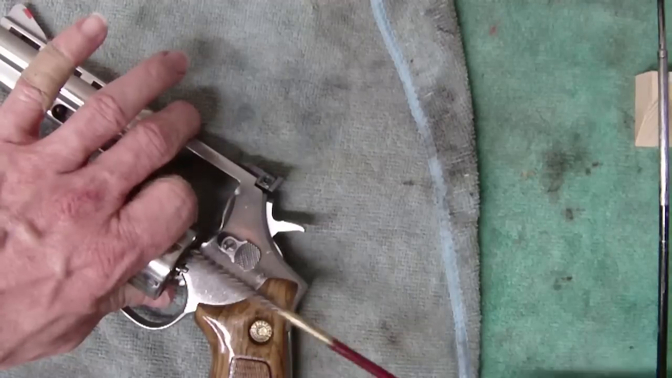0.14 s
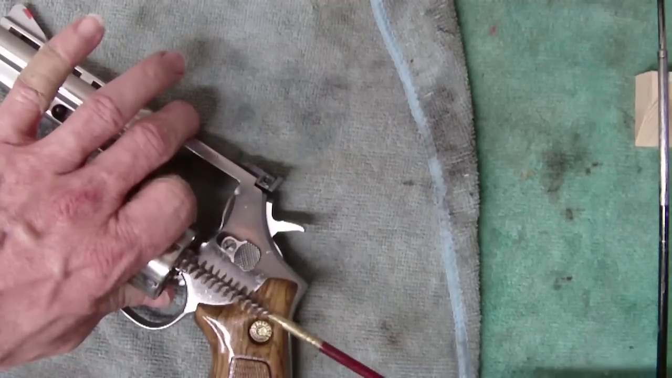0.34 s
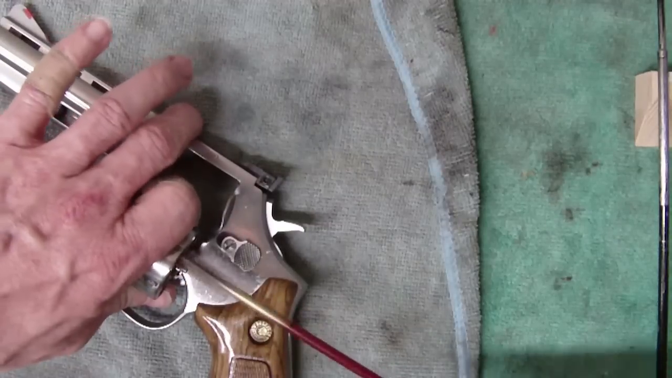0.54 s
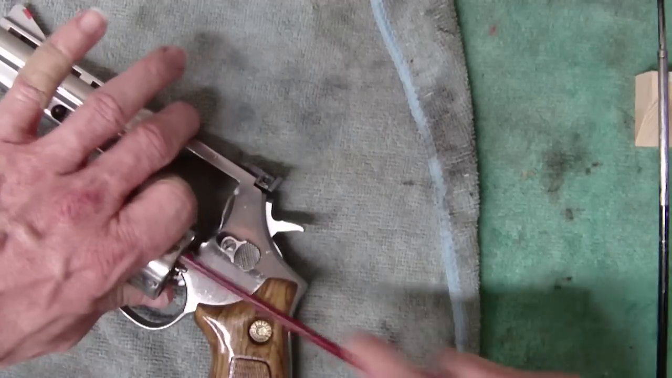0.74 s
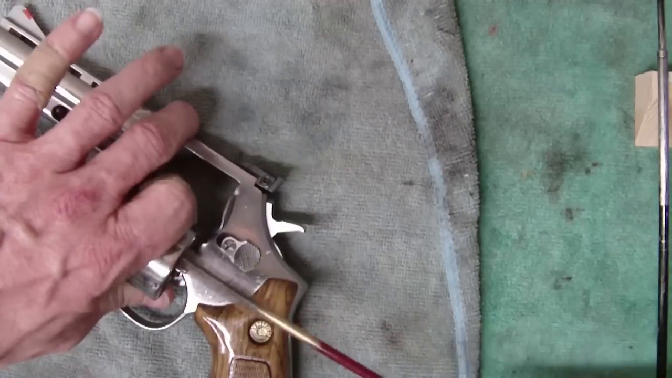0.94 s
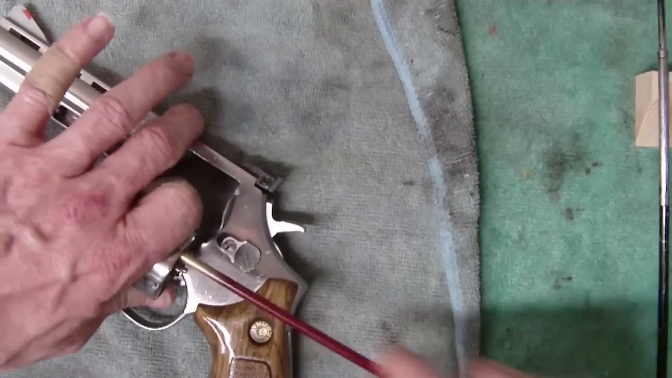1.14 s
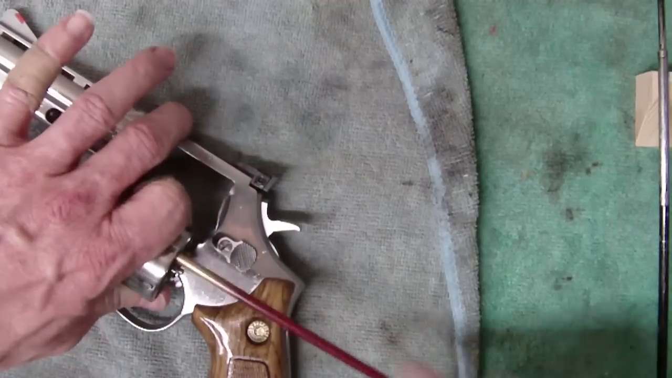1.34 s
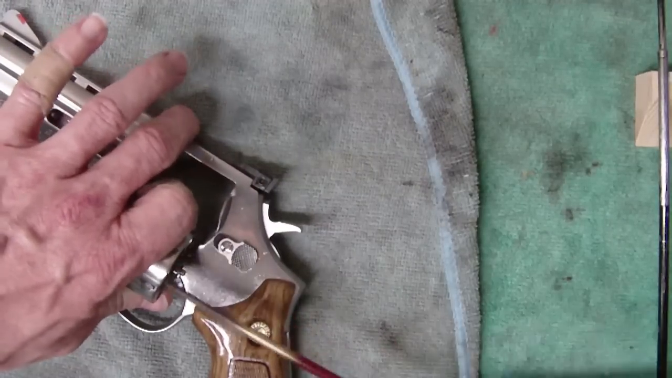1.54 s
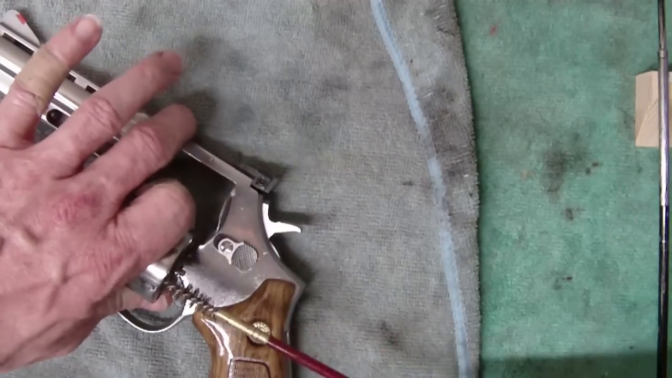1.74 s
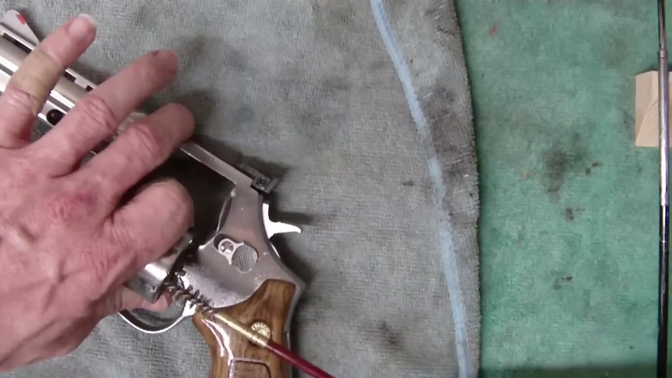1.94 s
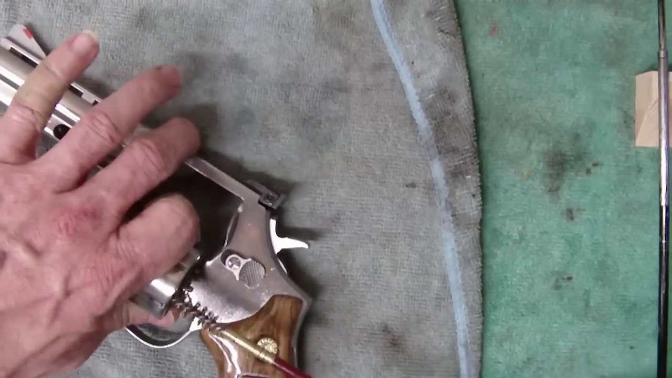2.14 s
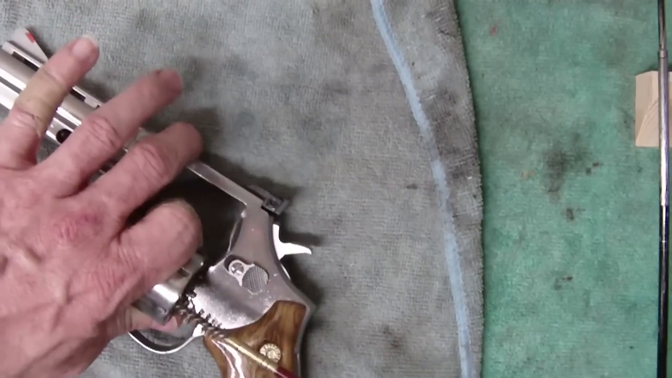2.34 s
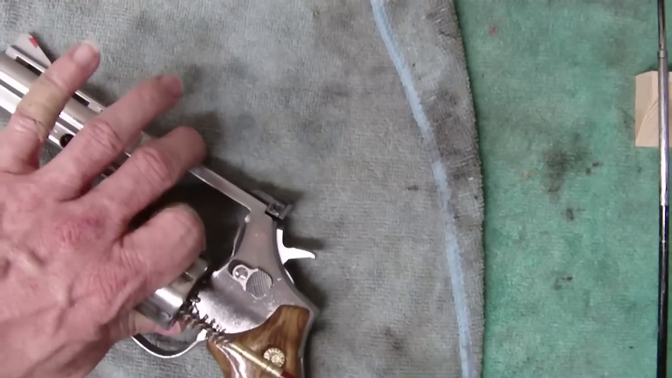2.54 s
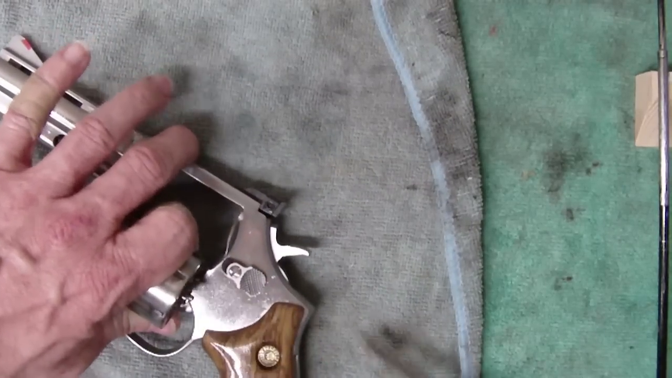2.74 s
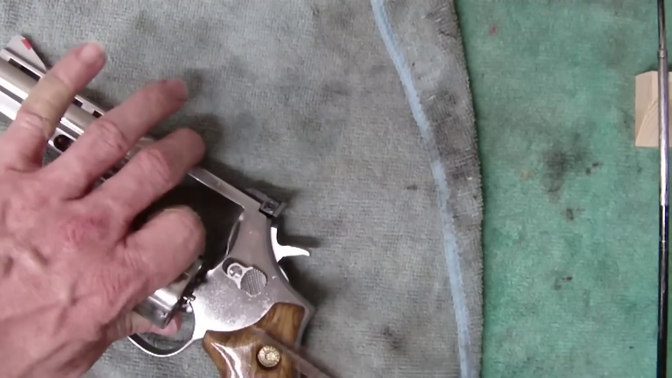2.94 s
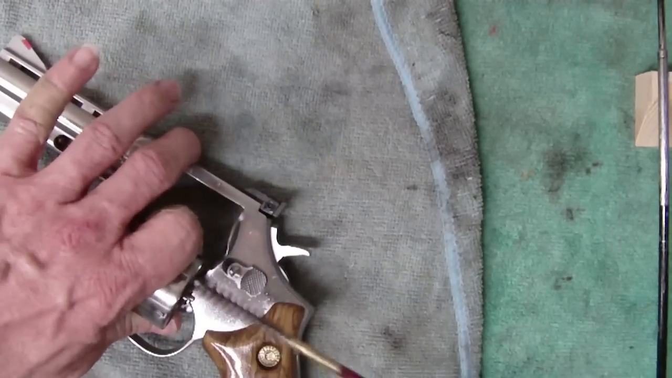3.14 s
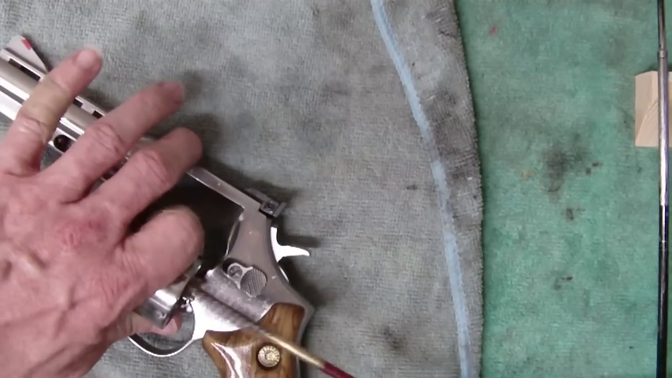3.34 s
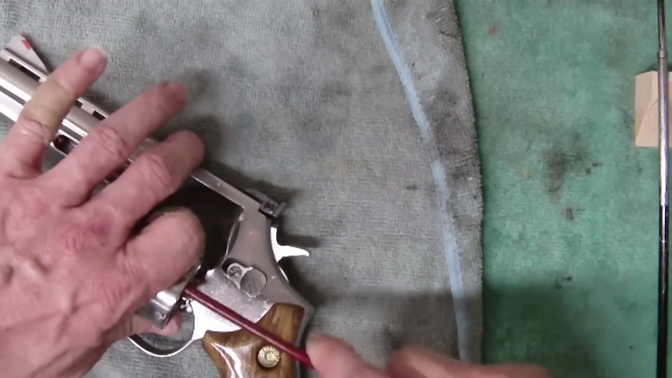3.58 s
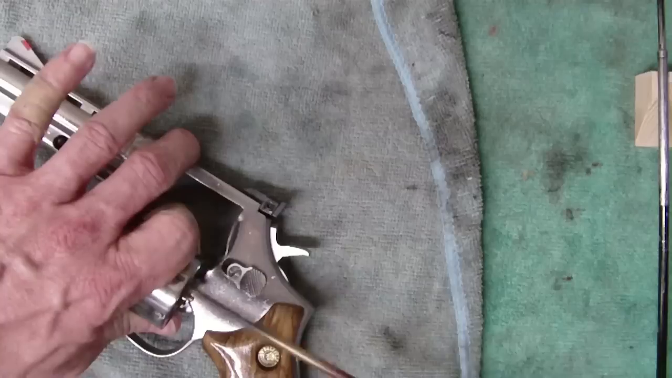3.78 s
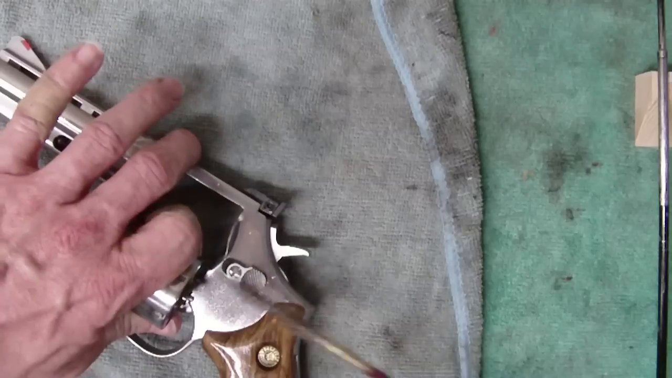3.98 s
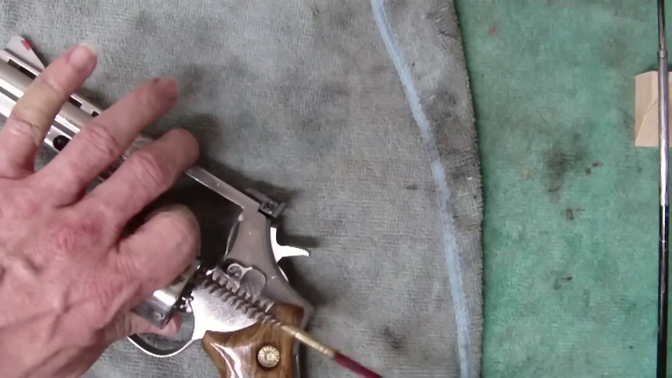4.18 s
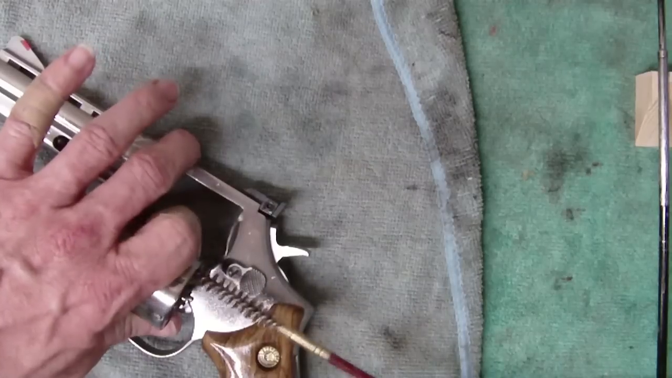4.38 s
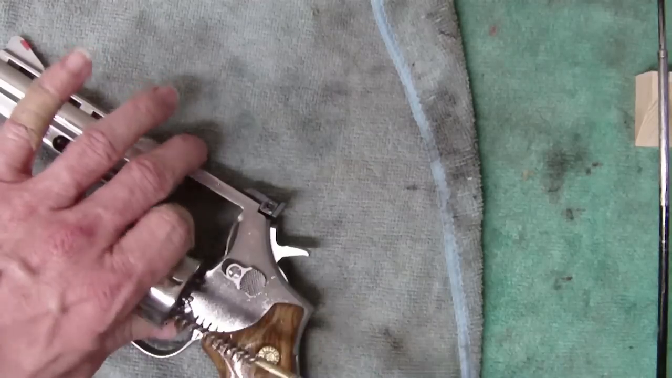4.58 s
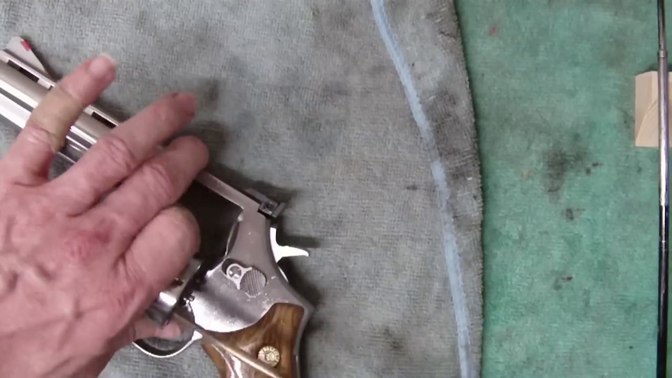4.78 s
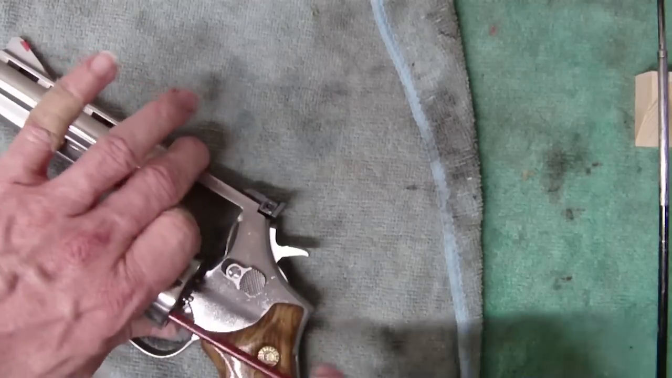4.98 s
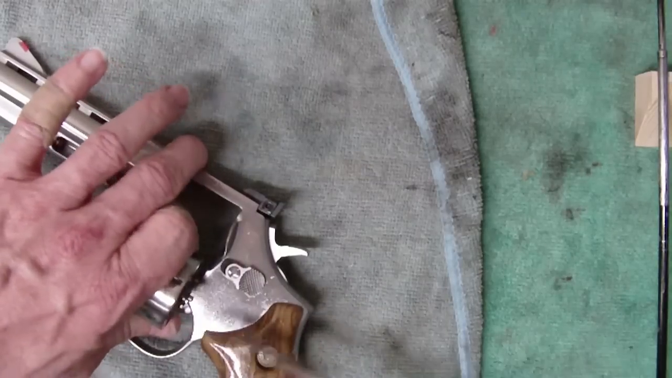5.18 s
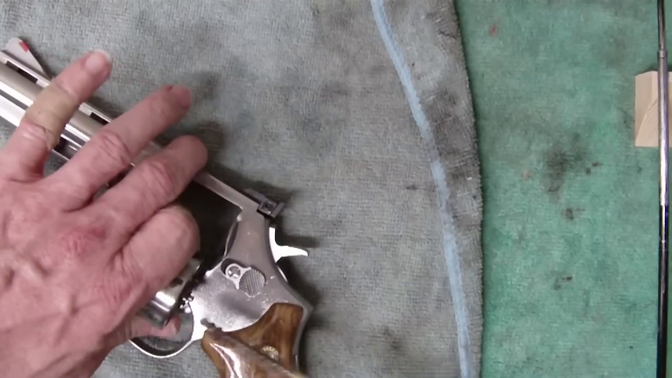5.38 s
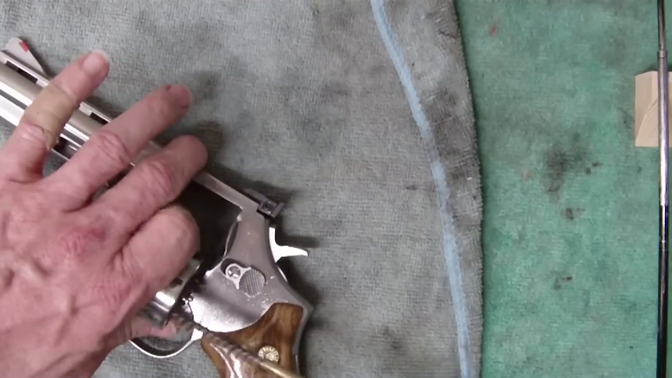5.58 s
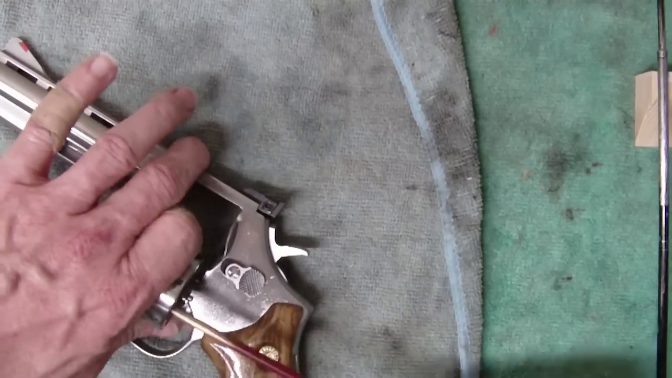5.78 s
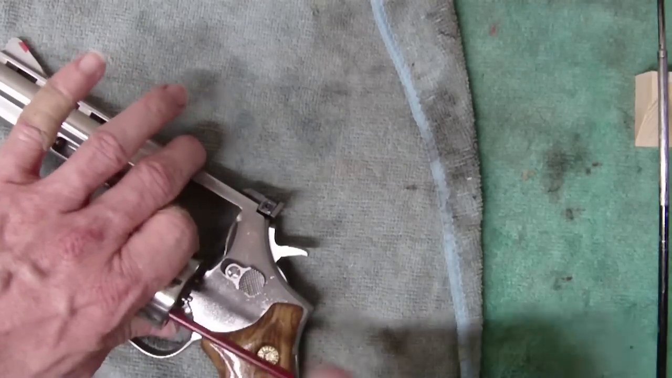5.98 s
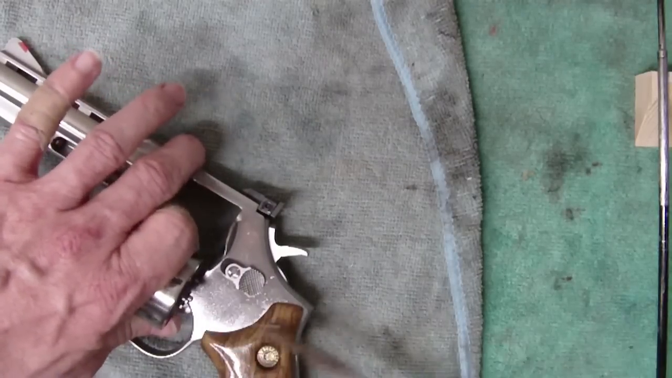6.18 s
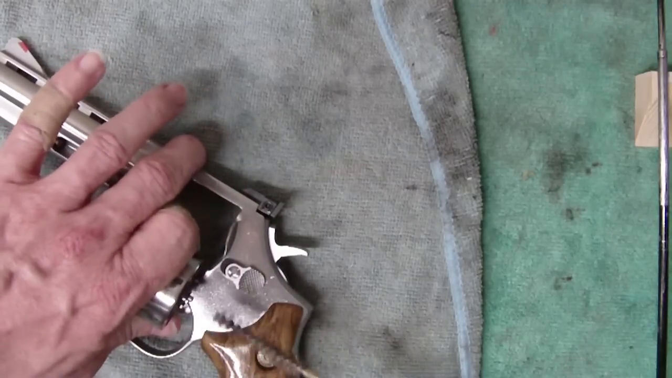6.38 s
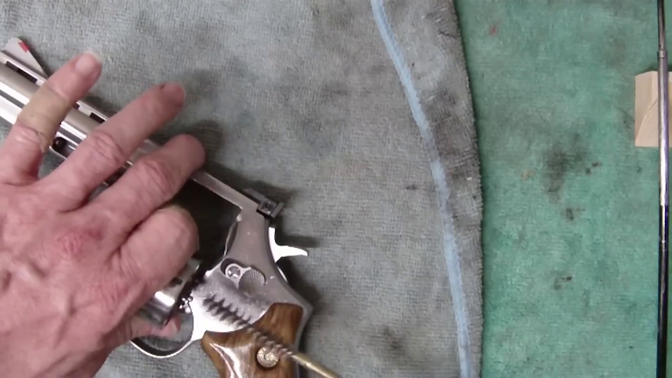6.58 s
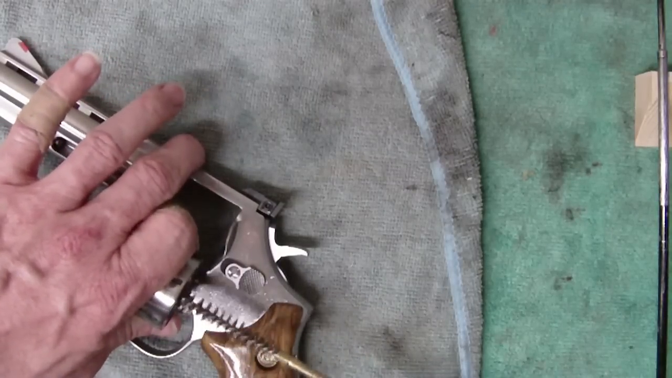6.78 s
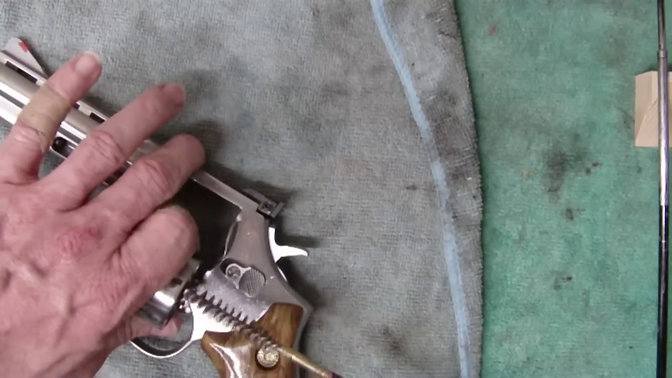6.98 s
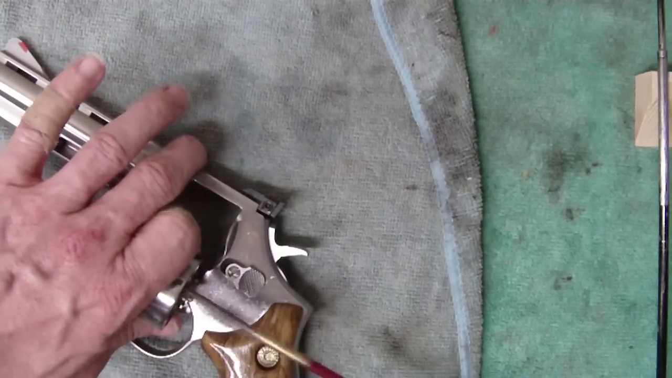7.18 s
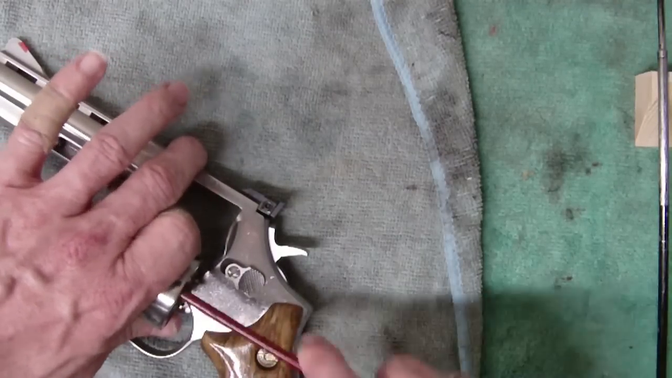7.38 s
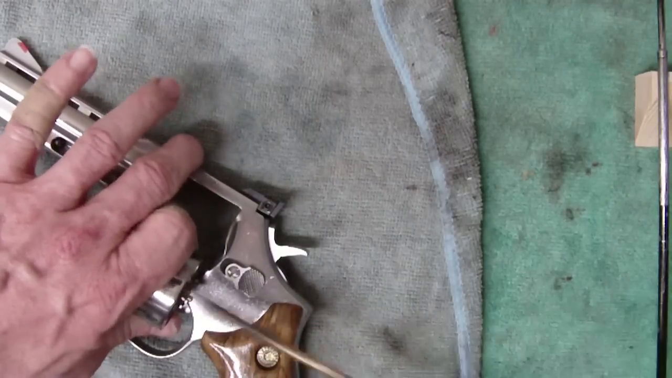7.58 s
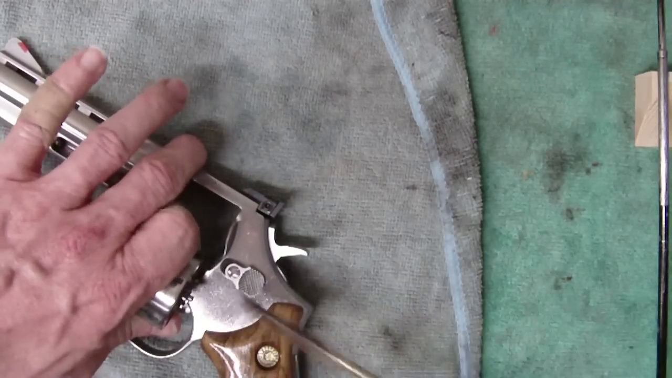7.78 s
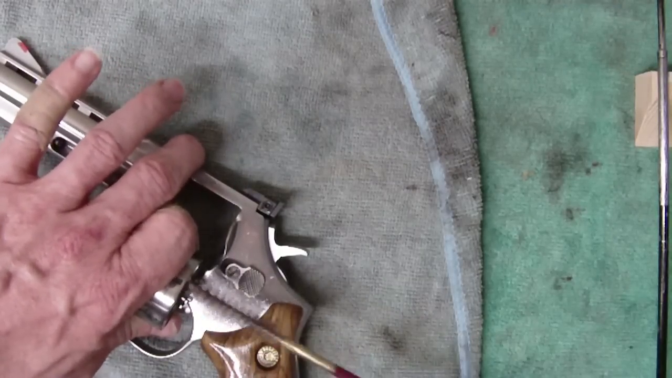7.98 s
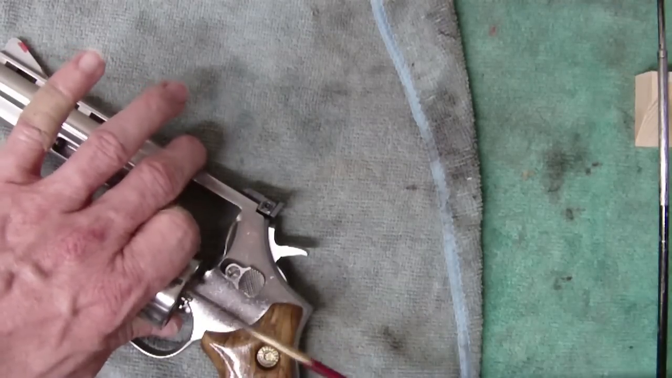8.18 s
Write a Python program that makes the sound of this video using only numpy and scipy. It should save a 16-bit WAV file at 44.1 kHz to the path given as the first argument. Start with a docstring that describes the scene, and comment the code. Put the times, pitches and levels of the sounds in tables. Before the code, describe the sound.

Close up, a stiff wire brush scrapes through small steel bores, hissing and grinding in paired strokes with ticks, hollow tunks and brief high squeaks.

```python
"""A wire brush on a cleaning rod hisses and grinds through a revolver's chambers, pushed in and pulled back up close.
Random bristle flicks, shaped by each stroke, drive filters for the tips and bore and damped modes for the steel.
Knocks strike the same parts; gliding sines make the hollow tunks and the squeaks of the rod.
Noise through low modes rocks the padded bench; a short noise tail and soft hiss make the small, quiet workshop."""
import sys
import numpy as np
from scipy import signal
from scipy.fft import rfft, irfft
from scipy.io import wavfile
from scipy.ndimage import uniform_filter1d, map_coordinates

SR = 44100
rng = np.random.default_rng(int(sys.argv[2]) if len(sys.argv) > 2 else 0)


def wrap_up_sound(samples):
    """Save the sound to the file named by the first command line argument, as 16-bit audio."""
    columns = np.atleast_2d(samples).T
    # keep every value between -1 and 1, then stretch to whole-number steps
    tamed = np.clip(columns, -1, 1)
    steps = np.round(tamed * 32767).astype(np.int16)
    wavfile.write(sys.argv[1], SR, steps)


N = 362733
TIME = np.arange(N) / SR
CONTROL = TIME[::32]  # coarse clock for the motion of the hands (s)

# Brush going in: it glides up to speed, bites into the bore, grinds on and stops. Each row: bite in seconds,
# attack, hold and release in seconds, then base level in dB of tips, rod, bore, frame, chamber and bench.
PUSH_STROKES = [(0.110, 0.11, .092, 0.071, -44.5, -42, -46.5, -47.5, -48, -37),
                (1.106, 0.12, 0.076, 0.049, -45, -42.5, -43, -48, -51, -41),
                (1.627, 0.22, 0.1, 0.062, -44, -40.5, -45.5, -48.5, -45.5, -38),
                (3.181, 0.034, 0.02, 0.018, -45.5, -47.5, -40.5, -44, -41, -36),
                (3.982, 0.15, 0.11, .042, -47.5, -41.5, -44.5, -46.5, -48.5, -35.5),
                (4.987, 0.04, 0.04, 0.044, -49.5, -51.5, -56.5, -46.5, -66, -61.5),
                (5.361, 0.14, 0.099, 0.04, -45, -39, -45.5, -49, -50, -43.5),
                (6.297, 0.13, 0.11, 0.043, -45, -44, -45, -47, -47.5, -38.5),
                (7.784, 0.097, 0.071, 0.039, -43.5, -41.5, -43, -48, -47, -38.5)]
# Brush drawn back, tight in the bore from the start. Each row: full speed in seconds, attack, hold and release
# in seconds, then base level in dB of tips, rod, bore, frame, chamber and bench.
PULL_STROKES = [(0.343, 0.062, 0.079, 0.062, -44, -46.5, -45.5, -44.5, -51.5, -45.5),
                (1.315, .075, 0.17, 0.062, -46.5, -46.5, -47.5, -46.5, -55, -45),
                (1.862, 0.098, 0.12, 0.057, -44, -45.5, -47.5, -44, -52, -48),
                (2.06, 0.013, .05, .085, -49.5, -45, -59, -52, -60.5, -46),
                (3.232, 0.0047, 0.0087, .035, -42, -55, -41, -48, -44.5, -38),
                (4.223, 0.058, 0.081, 0.031, -43.5, -42.5, -44, -43, -48, -44.5),
                (5.596, 0.068, 0.073, 0.038, -44, -44, -45.5, -44, -51.5, -44),
                (6.573, 0.075, 0.065, 0.045, -45.5, -45.5, -45.5, -47, -49, -42.5),
                (8.032, 0.079, 0.062, 0.037, -45.5, -46.5, -46, -44, -48.5, -40.5)]
# Rod sticking and slipping as the stroke turns round. Each row: start in seconds, level in dB, pitch in Hz.
ROD_SQUEAKS = [(0.2188, -38, 3990), (0.2601, -34, 4590), (1.268, -41.5, 4550), (1.7858, -30, 4600),
               (1.8138, -41, 4800), (4.0841, -34, 4700), (4.1364, -38.5, 4640), (5.4804, -42.5, 4900),
               (6.4854, -43, 4450), (7.6835, -50, 3520), (7.958, -48, 4730)]
# Ringing modes of the cleaning rod. Each row: frequency in Hz, width in Hz, relative level in dB.
ROD_MODES = [(3910, 290, -7), (4190, 180, -6), (4492, 93, -0.5), (4648, 80, 1), (4744, 67, 3.5),
             (5010, 59, -3.5), (5130, 200, -2), (5355, 120, 2), (5457, 200, -4)]
# Hiss of the free bristle tips. Each row: frequency in Hz, relative level in dB.
TIP_SPECTRUM = [(2000, -28), (4000, -7.5), (5700, 2.5), (6800, -0.5), (7500, 0), (8400, -0.5), (9200, -0.5),
                (10100, 1.5), (11500, -2.5), (13000, -6.5), (15800, -11)]


def undb(db):
    """Decibels to gain."""
    return 10 ** (np.asarray(db) / 20)


def unit(response):
    """Scale a signal to unit energy."""
    return response / np.sqrt(np.sum(response ** 2))


def through(x, response):
    """Pass a force through an impulse response."""
    return signal.fftconvolve(x, response)[:N]


def colour(points, size=4096):
    """Minimum-phase impulse response shaped by (Hz, dB) points, with unit energy."""
    hz, db = np.transpose(points)
    bins = np.maximum(np.arange(size // 2 + 1) * SR / size, 1)
    level_db = np.interp(np.log(bins), np.log(hz), db)
    cepstrum = irfft(np.log(undb(level_db)))
    # folding the cepstrum makes the response causal
    cepstrum[1:size // 2] *= 2
    cepstrum[size // 2 + 1:] = 0
    return unit(irfft(np.exp(rfft(cepstrum))))


def ring(modes, size=16384):
    """Impulse response of damped modes; neighbours swing in opposite directions."""
    t = TIME[:size]
    total = np.zeros(size)
    for k, (hz, width_hz, db) in enumerate(modes):
        decay = np.exp(-np.pi * width_hz * t)
        total += (-1) ** k * undb(db) * width_hz * decay * np.sin(2 * np.pi * hz * t)
    return unit(total)


def high_pass(x, hz, order=2):
    """Small parts radiate little bass."""
    return signal.sosfilt(signal.butter(order, hz, "high", fs=SR, output="sos"), x)


def walk(rate):
    """Random wander with a spread near 1, gliding between new values at the given rate per second."""
    knots = rng.standard_normal(N // 8)
    return np.sqrt(1.5) * np.interp(TIME * rate, np.arange(len(knots)), knots)


def hump(s, db, length_s):
    """A smooth swell of gain around one moment."""
    return undb(db) * np.exp(-((CONTROL - s) / length_s) ** 2)


def swell_db(start_s, attack_s, hold_s, release_s, sag_db_per_s):
    """Level of one stroke: the hand speeds up, holds with a tilt in level, and slows down."""
    # attack and release times span 20 dB; the powers bend the rise and fall
    early = np.maximum(start_s - CONTROL, 0) / attack_s
    late = np.maximum(CONTROL - start_s - hold_s, 0) / release_s
    since_middle = np.clip(CONTROL - start_s, 0, hold_s) - hold_s / 2
    return -20 * (early ** 1.82 + late ** 0.96) - sag_db_per_s * since_middle


def flicks(per_second, spread_db):
    """Bristles snapping free at random moments, many weak and a few strong; rms 1."""
    fired = rng.random(N) < per_second / SR
    strength_db = spread_db * np.minimum(rng.exponential(size=N), 5)
    clicks = fired * rng.choice([-1, 1], N) * undb(strength_db)
    return clicks / np.std(clicks)


def rubbing():
    """Forces of the moving brush on the tips, rod, bore, frame and chamber, made of random bristle flicks."""
    catch_db = 1.3 * walk(rate=190) + .6 * walk(rate=36)  # rows of bristles catch and slip together
    chatter_db = 1.2 * walk(rate=330)  # the rod rattles in the mouth of the chamber
    fine = flicks(per_second=6500, spread_db=2.0)
    coarse = flicks(per_second=2800, spread_db=1.5)
    drag = flicks(per_second=1500, spread_db=0.65)
    tips = bore_echo(fine, share=0.3, trip_s=.00028, travel=0.41)
    rod = bore_echo(coarse, share=.3, trip_s=.0007, travel=.25) * undb(chatter_db)
    bore = bore_echo(fine, share=0.55, trip_s=0.000505, travel=.35)
    forces = [tips, rod, bore, coarse, drag]
    return [force * drive(order) * undb(catch_db) for order, force in enumerate(forces)]


def drive(order):
    """How hard the strokes rub the part of that order: loose, bite and jam in a push, sag, then a light touch."""
    # How tips, rod, bore, frame and chamber answer a stroke. Each row: change while a pushed brush is loose in dB,
    # change at the jam in dB, sag in a push in dB/s, sag in a pull in dB/s (negative sags grow louder),
    # share of the release time, unevenness in dB, level of the lingering light touch in dB.
    response = [(0, 1, 10, 5.5, .95, 0.38, -32), (1, -1, 4.5, 10.5, 0.63, 1.0, -25),
                (-12.5, 4, 24.5, -30, 1.1, 1.0, -27.5), (-1.5, 2.5, 15, 5, 0.57, 1.6, -22),
                (-14, 2, 20, 55, 1.35, 1.24, -23)]
    # When the bristles touch the steel. Each row: start in seconds, end in seconds.
    touches = [(-.05, 0.46), (.69, 0.94), (.925, 1.495), (1.533, 1.94), (2.058, 2.29), (3.14, 3.25),
               (3.848, 4.366), (4.79, 5.15), (5.25, 5.77), (6.135, 6.7), (7.62, 8.15)]
    bite_s, jam_s = .006, 0.015  # time to wedge into the bore; delay and length of the jam
    linger_s = .3  # the light touch rises and fades by 20 dB in this time
    meet_s, part_s = 0.012, .025  # softness of the bristles meeting and leaving the steel
    loose_db, jam_db, push_sag, pull_sag, release_share, uneven_db, touch_db = response[order]
    power = 0
    for strokes, pushing, sag in ((PUSH_STROKES, True, push_sag), (PULL_STROKES, False, pull_sag)):
        for s, attack_s, hold_s, release_s, *parts_db in strokes:
            rub_db = swell_db(s, attack_s, hold_s, release_s * release_share, sag)
            if pushing:
                loose = (1 - np.tanh((CONTROL - s) / bite_s)) / 2
                rub_db = rub_db + loose_db * loose + jam_db * hump(s + jam_s, 0, jam_s)
            light_db = touch_db + swell_db(s, linger_s, hold_s, linger_s, 0)
            power = power + undb(parts_db[order] + rub_db) ** 2
            power = power + undb(parts_db[order] + light_db) ** 2
    touching = 0
    for start, end in touches:
        meeting = np.tanh((CONTROL - start) / meet_s)
        parting = np.tanh((CONTROL - end) / part_s)
        touching = touching + (meeting - parting) / 2
    return np.interp(TIME, CONTROL, touching * np.sqrt(power)) * undb(uneven_db * walk(rate=45))


def bore_echo(x, share, trip_s, travel):
    """Sound bounces between brush and chamber mouth; the echo delay wanders, sweeping the colour."""
    lag = trip_s * SR * np.exp(travel * walk(rate=14))  # samples
    echo = map_coordinates(x, [np.arange(N) - lag], order=3)
    return (x - share * echo) / np.sqrt(1 + share ** 2)


def knocking(order, size=2048):
    """Force of the knocks on the part of that order: a sharp contact, then a short scuff as the rod skids."""
    # Rod and brush tip striking the steel; hard contacts tick, soft ones ring the frame.
    # Each row: start in seconds, base level in dB, hardness in dB.
    knocks = [(0.1961, -42, 6), (0.2925, -41, 9.5), (0.3571, -35, -6), (0.6853, -36, -9.5),
              (0.7218, -37, -6), (0.7925, -42, 1.5), (0.9252, -51, 0.5), (1.5327, -38, -2),
              (1.7257, -27.5, 6.5), (1.988, -57, 6), (2.0591, -43, -2), (3.1667, -44, 4.5),
              (3.2282, -32.5, -4), (3.3745, -55.5, 2.5), (3.4448, -64, 2), (3.8493, -53.5, -5.5),
              (3.9137, -41, -2.5), (4.068, -49, 16), (4.0836, -39, 8.5), (4.7854, -59, -1.5),
              (5.2565, -56.5, -6), (5.4811, -40, 5.5), (6.1386, -57, -11), (6.2200, -46, -2),
              (6.3917, -33, 7), (6.4884, -46.5, 1), (7.6186, -57, -6), (7.656, -51.5, -.5),
              (7.9816, -44, -7)]
    # What a knock gives to tips, rod, bore, frame and chamber.
    # Each row: gain in dB, dB per dB of hardness, scuff level in dB, scuff decay in seconds.
    contact = [(12.8, 0.96, 1, .0023), (19.92, 0.96, 2, .0044), (12, 0.5, -5.5, .003),
               (21.6, -0.67, -14.5, .003), (13, 0.35, -12.5, .004)]
    gain_db, tilt, scuff_db, scuff_s = contact[order]
    force = np.zeros(N + size)
    for s, db, hardness_db in knocks:
        scuff = unit(rng.standard_normal(size) * np.exp(-TIME[:size] / scuff_s))
        blow = undb(scuff_db) * scuff
        blow[0] += 1
        start = int(s * SR)
        force[start:start + size] += unit(blow) * undb(db + gain_db + tilt * hardness_db)
    return force[:N]


def gun_parts():
    """Impulse responses of tips, rod, bore, frame and chamber: bristle spectra and ringing steel and air."""
    # Bristles bent tight in the bore. Each row: frequency in Hz, relative level in dB.
    grind = [(150, -24.5), (300, -1), (850, -8.5), (1300, -10.5), (1600, -2), (2400, 3), (2800, -1.5),
             (3400, 7), (3700, 0.5), (4400, -3), (6000, -5.5), (12000, -23)]
    # Modes of the cylinder walls. Each row: frequency in Hz, width in Hz, relative level in dB.
    cylinder = [(2570, 51, -3.5), (2748, 49, 3.5), (3007, 54, -7.5), (3460, 48, -1)]
    # Modes of the steel frame. Each row: frequency in Hz, width in Hz, relative level in dB.
    frame = [(1365, 264, -19.5), (1746, 37, -4), (1843, 80, -3), (1909, 48, 3), (1995.5, 32, 0),
             (2055, 37, -13), (2148, 40, -4.5), (2396, 85, -11.5)]
    # Modes of the hollow chamber. Each row: frequency in Hz, width in Hz, relative level in dB.
    chamber = [(342, 47, -3), (426.6, 26, -2), (494.7, 45, -6), (573, 32, 1), (606, 39, -4),
               (702.3, 25, -3.5), (744, 84, -17), (921, 35, -13), (1105, 55, -2), (1325, 150, -11.5)]
    bore = colour(grind, size=16384) + undb(-5) * high_pass(ring(cylinder), 2200)
    rod = high_pass(ring(ROD_MODES), 3400)
    return [colour(TIP_SPECTRUM), rod, unit(bore), high_pass(ring(frame), 1200), high_pass(ring(chamber), 260)]


def tunks(start_hz, end_hz, glide_s, breadth_hz, size=8192):
    """The air column lengthens behind the brush, so its rough note falls quickly and dies."""
    # Hollow tunks as the brush plugs or leaves a chamber. Each row: start in seconds, level in dB, length in seconds.
    tunk_rows = [(0.195, -31.5, 0.023), (0.693, -38.5, 0.04), (1.188, -44.5, 0.039), (2.122, -50, 0.053),
                 (4.32, -43.5, 0.037), (4.707, -67, 0.043), (6.281, -46.5, 0.074), (7.857, -46, 0.061)]
    out, t = np.zeros(N + size), TIME[:size]
    for s, db, length_s in tunk_rows:
        glide_hz = end_hz + (start_hz - end_hz) * np.exp(-t / glide_s)
        hz = glide_hz + breadth_hz * walk(rate=650)[:size]
        swell = (1 - np.exp(-t / 0.0047)) * np.exp(-(t / length_s) ** 2)
        flutter_db = 2.2 * walk(rate=420)[:size]  # the air leaks unevenly through the bristles
        start = int(s * SR)
        out[start:start + size] += undb(db + flutter_db) * swell * np.sin(2 * np.pi * np.cumsum(hz) / SR)
    return out[:N]


def squeaks(length_s, waver_hz, rough_db, size=4096):
    """Stick and slip lock onto one wavering note of the rod for about a hundredth of a second."""
    out, t = np.zeros(N + size), TIME[:size]
    for s, db, hz in ROD_SQUEAKS:
        phase = np.cumsum(hz + waver_hz * walk(rate=630)[:size]) / SR
        swell = (1 - np.exp(-t / 0.00099)) * np.exp(-(t / length_s) ** 2)
        level_db = db + rough_db * walk(rate=380)[:size]
        start = int(s * SR)
        out[start:start + size] += undb(level_db) * swell * np.sin(2 * np.pi * phase)
    return out[:N]


def judder(level_db, lag_s, length_s):
    """Rough force on the rod as it scrapes through each squeak, a little behind the note."""
    swell = sum(hump(s + lag_s, db + level_db, length_s) for s, db, _ in ROD_SQUEAKS)
    return flicks(per_second=3000, spread_db=0.5) * np.interp(TIME, CONTROL, swell)


def swishes(low_hz, rod_db):
    """Free bristle tips whisper over the rim, barely sounding the rod."""
    # Tips sweeping over the rim of a chamber. Each row: middle in seconds, force in dB, length in seconds.
    sweeps = [(2.192, -64, 0.062), (4.94, -64.5, 0.067), (5.094, -66, 0.055), (6.152, -61.5, 0.026),
              (6.715, -59.5, 0.015)]
    swell = sum(hump(*row) for row in sweeps)
    force = flicks(per_second=5700, spread_db=5.5) * np.interp(TIME, CONTROL, swell)
    whisper = high_pass(through(force, colour(TIP_SPECTRUM)), low_hz)
    return whisper + undb(rod_db) * through(force, ring(ROD_MODES[:2]))


def handling(parts, per_second, db, count=3):
    """Stray bristles and fingers make tiny random ticks on the first, bright parts of the gun."""
    ticks = (rng.random(N) < per_second / SR) * undb(db + 3.3 * rng.standard_normal(N))
    return sum(through(ticks, part) for part in parts[:count])


def reflect(x, delay_s, share):
    """Add one slightly later copy from a nearby surface, which ripples the spectrum."""
    return (x + share * np.interp(TIME - delay_s, TIME, x, left=0)) / np.sqrt(1 + share ** 2)


def bench(rest_db, pull_lag_s, attack_s, release_s, travel_db, stop_lag_s, stop_s):
    """The bench rocks in its low modes: through each stroke, hardest as a push hits its stop, and in each lean."""
    # Low modes of the padded bench. Each row: frequency in Hz, width in Hz, relative level in dB.
    bench_modes = [(32, 24, -24.5), (58.4, 31, 4.5), (80.5, 15, 5.5), (119, 14, 3), (157.3, 14, -4.5),
                   (207.2, 67, -12.5)]
    # Hands shifting their weight between strokes. Each row: middle in seconds, level in dB, length in seconds.
    leans = [(0.74, -49, .04), (0.836, -46.5, 0.048), (0.958, -55, .03), (3.804, -55, 0.028),
             (4.75, -63, 0.054), (5.137, -60, 0.037)]
    # the bench never quite stops under the resting hands
    power = undb(rest_db) ** 2 + sum(hump(*row) ** 2 for row in leans)
    for s, rise_s, hold_s, *_, db in PUSH_STROKES:
        travel = swell_db(s, rise_s + attack_s, hold_s, release_s, 0)
        power = power + undb(db + travel_db + travel) ** 2
        power = power + hump(s + hold_s + stop_lag_s, db, stop_s) ** 2
    for s, rise_s, hold_s, *_, db in PULL_STROKES:
        travel = swell_db(s + pull_lag_s, rise_s + attack_s, hold_s, release_s, 0)
        power = power + undb(db + travel) ** 2
    rocking = high_pass(through(rng.standard_normal(N), ring(bench_modes)), 38)
    rocking = rocking / np.sqrt(uniform_filter1d(rocking ** 2, size=2048))  # even out the noise level
    return rocking * np.interp(TIME, CONTROL, np.sqrt(power))


def workshop(x, wet_db, t60_s, size=22050):
    """Close walls and shelves return a short, soft-edged tail."""
    t = TIME[:size]
    tail = rng.standard_normal(size) * np.exp(-np.log(1000) * t / t60_s) * (1 - np.exp(-t / 0.002))
    tail = signal.sosfilt(signal.butter(1, 7000, fs=SR, output="sos"), tail)
    return x + undb(wet_db) * through(x, unit(tail))


def still_air(db):
    """Steady noise, weighted to the bass, for the still air of the room."""
    # Spectrum of the still air. Each row: frequency in Hz, relative level in dB.
    air_spectrum = [(25, -20.5), (80, -10.5), (160, -17.5), (500, -15.5), (1100, -23), (2200, -24.5),
                    (4000, -28.5), (8000, -38), (12000, -41), (15500, -59)]
    return undb(db) * through(rng.standard_normal(N), colour(air_spectrum))


def scene():
    """Rubbing and knocks drive the same parts; the room and its still air surround them."""
    parts = gun_parts()
    rod = parts[1]
    gun = np.zeros(N)
    for order, (rub, part) in enumerate(zip(rubbing(), parts)):
        gun += through(rub + knocking(order), part)
    gun = gun + tunks(start_hz=768, end_hz=569, glide_s=0.0089, breadth_hz=138)
    gun = gun + squeaks(length_s=0.0085, waver_hz=191, rough_db=5.5)
    gun = gun + through(judder(level_db=-3, lag_s=0.0073, length_s=.008), rod)
    gun = gun + swishes(low_hz=6150, rod_db=-8)
    gun = gun + handling(parts, per_second=11, db=-64.5)
    gun = reflect(gun, delay_s=0.001414, share=0.16)  # the side of the gun and the hand over it
    rocking = bench(rest_db=-73, pull_lag_s=0.01, attack_s=0.019, release_s=.13, travel_db=-10,
                    stop_lag_s=0.015, stop_s=0.024)
    return (workshop(gun, wet_db=-15, t60_s=.22) + rocking + still_air(db=-74))[None]


def record(dry):
    """A steep low-pass cuts the top of the treble."""
    top_hz = 15750
    return signal.sosfilt(signal.ellip(10, .2, 70, top_hz, fs=SR, output="sos"), dry)


dry = scene()
out = record(dry)
wrap_up_sound(out)
```